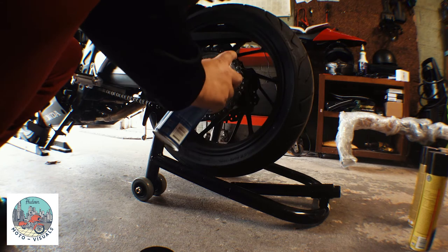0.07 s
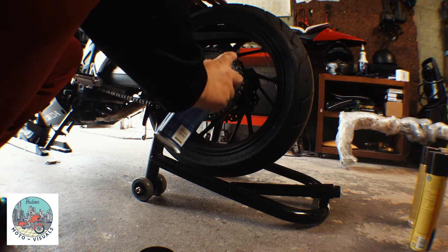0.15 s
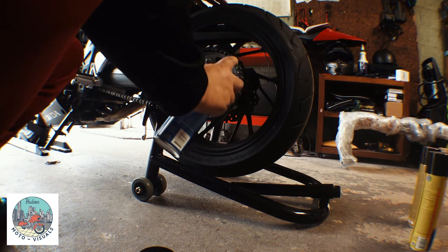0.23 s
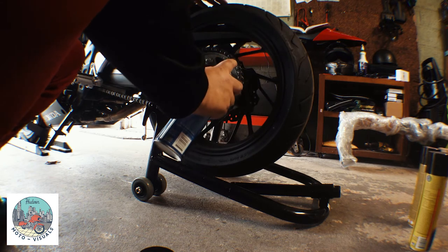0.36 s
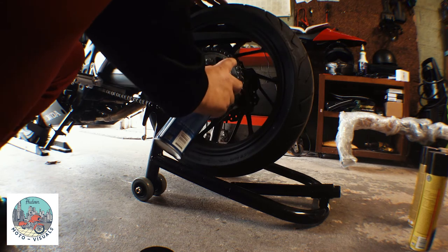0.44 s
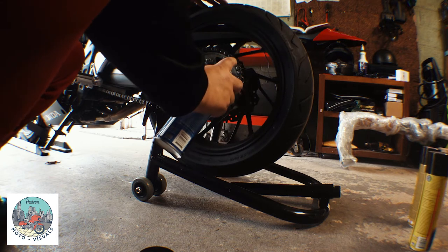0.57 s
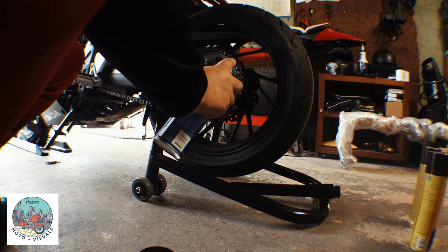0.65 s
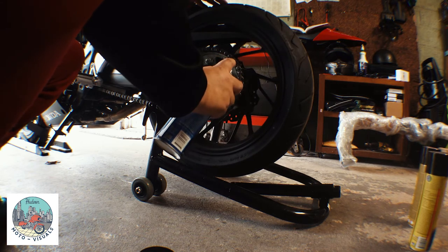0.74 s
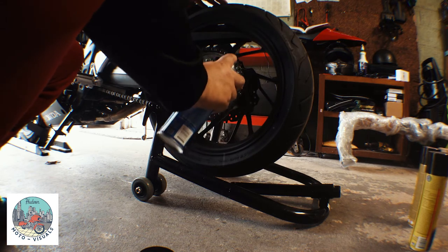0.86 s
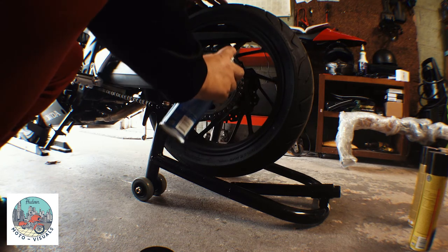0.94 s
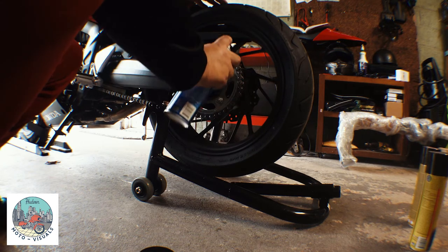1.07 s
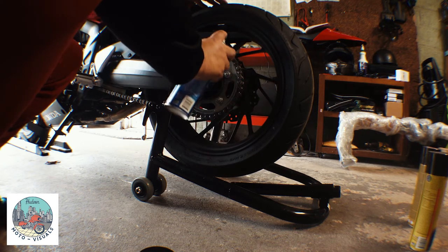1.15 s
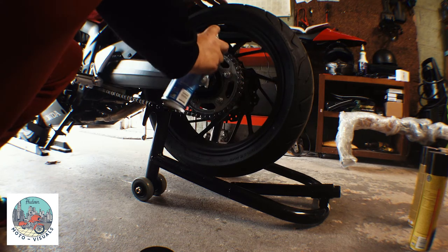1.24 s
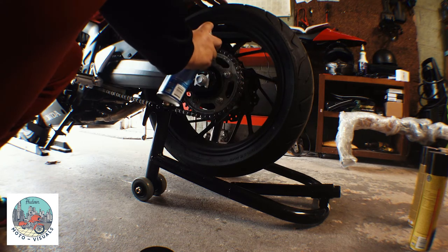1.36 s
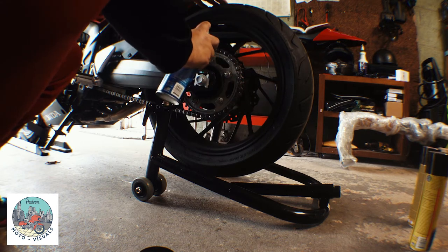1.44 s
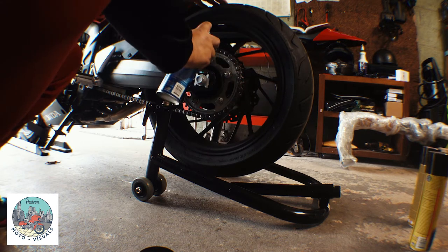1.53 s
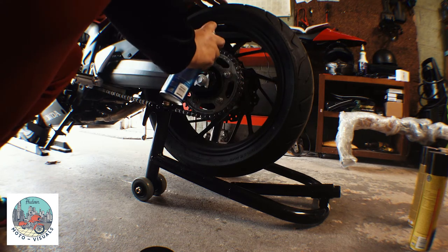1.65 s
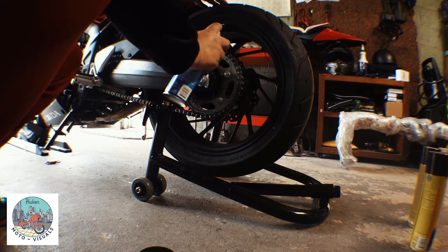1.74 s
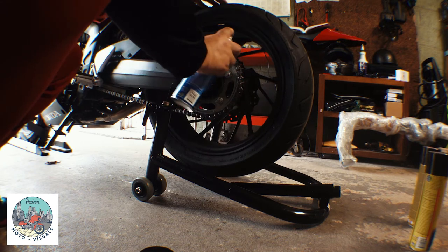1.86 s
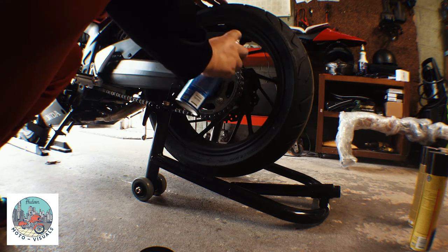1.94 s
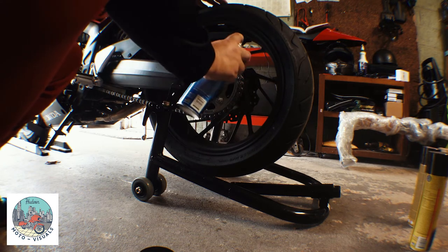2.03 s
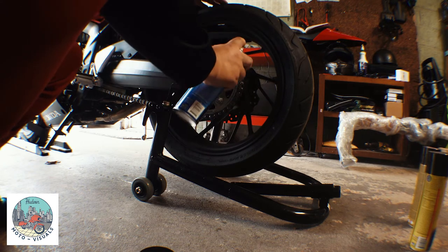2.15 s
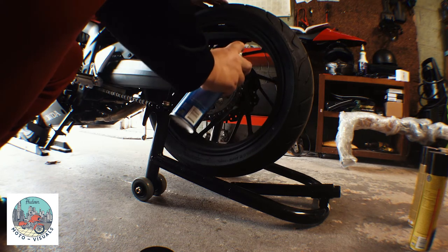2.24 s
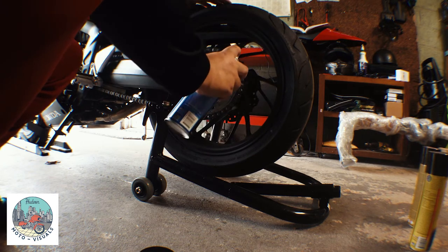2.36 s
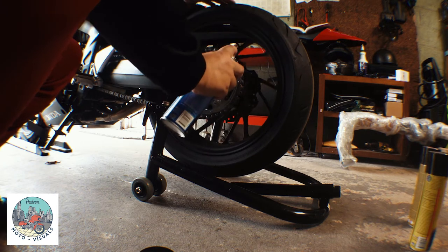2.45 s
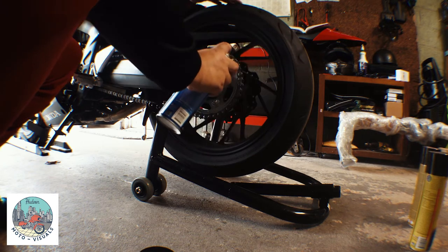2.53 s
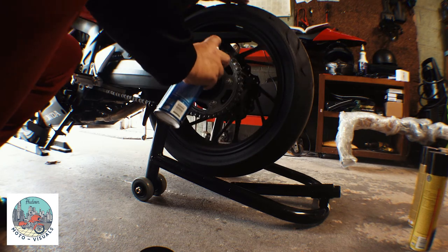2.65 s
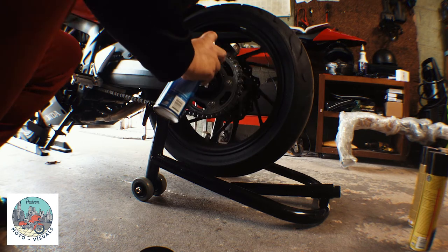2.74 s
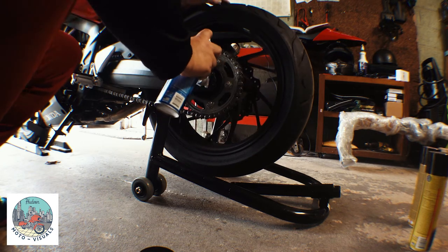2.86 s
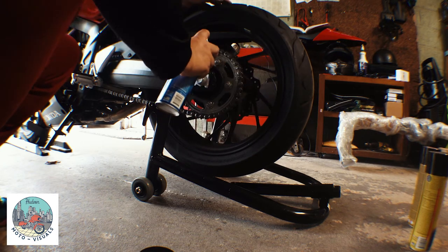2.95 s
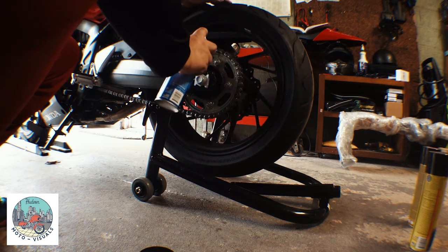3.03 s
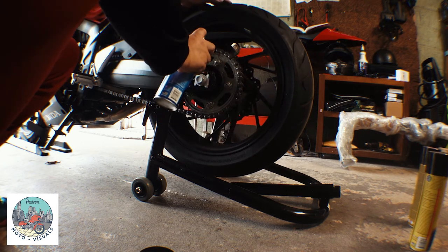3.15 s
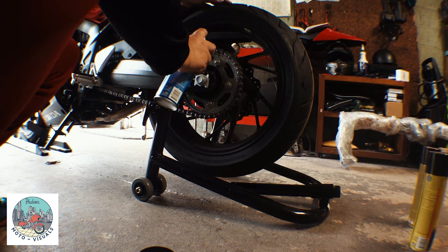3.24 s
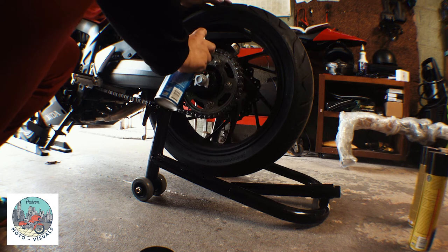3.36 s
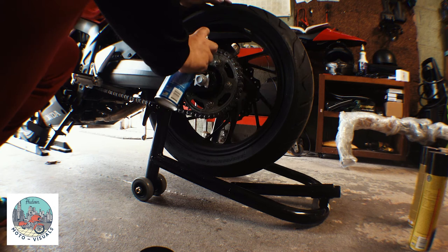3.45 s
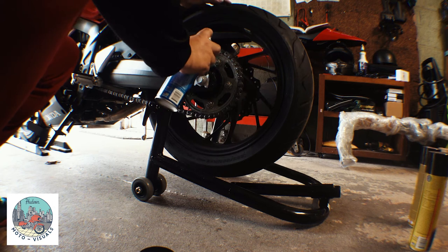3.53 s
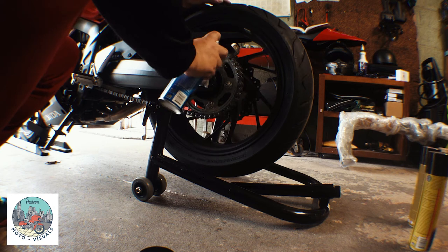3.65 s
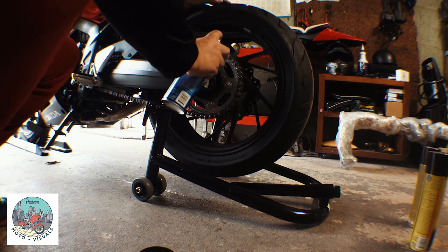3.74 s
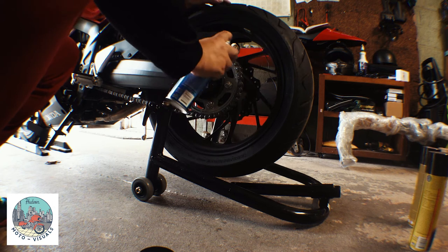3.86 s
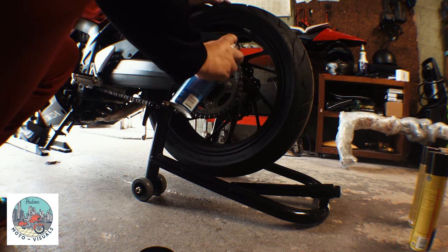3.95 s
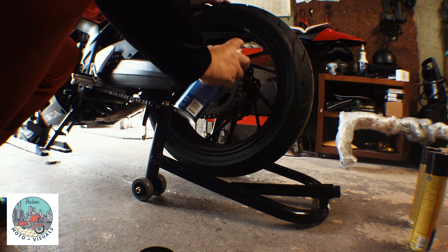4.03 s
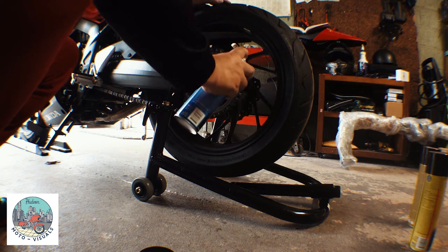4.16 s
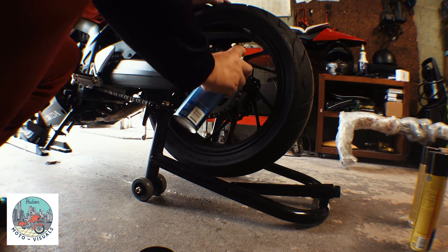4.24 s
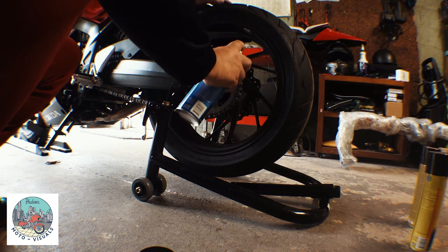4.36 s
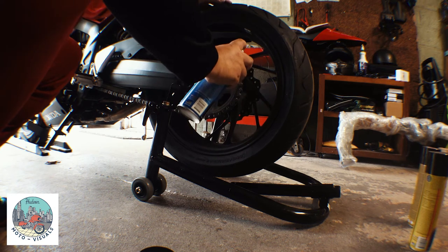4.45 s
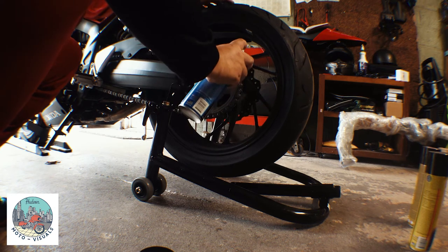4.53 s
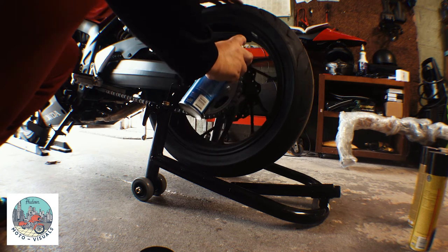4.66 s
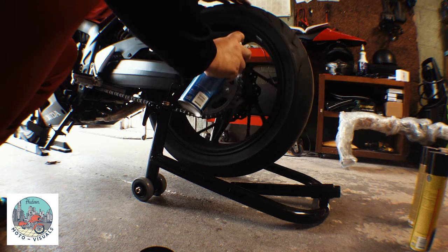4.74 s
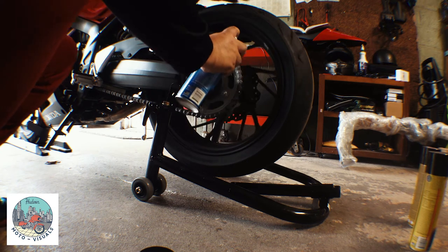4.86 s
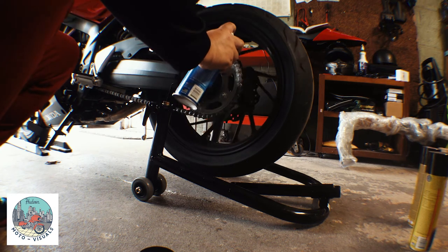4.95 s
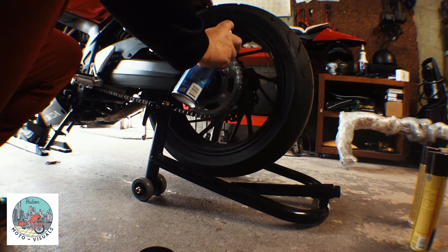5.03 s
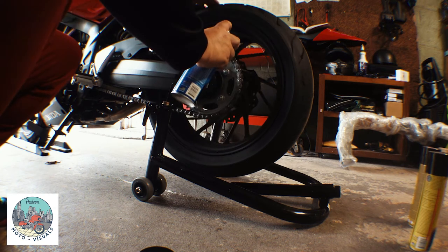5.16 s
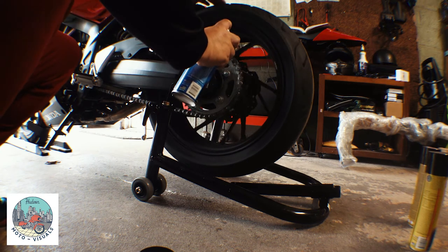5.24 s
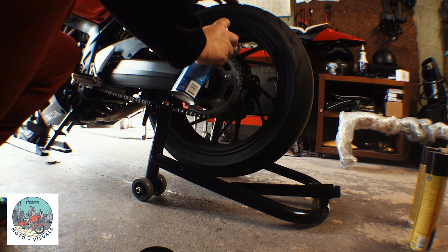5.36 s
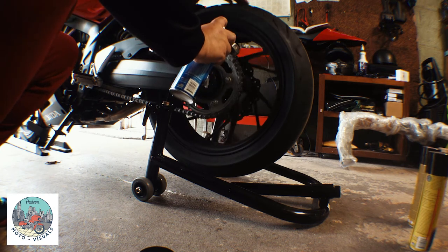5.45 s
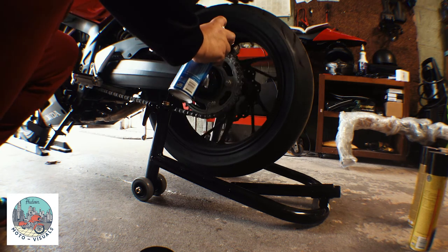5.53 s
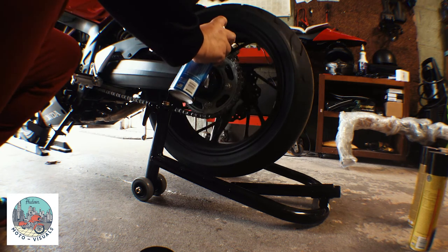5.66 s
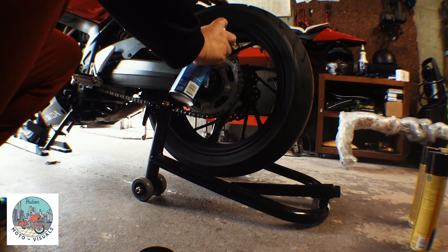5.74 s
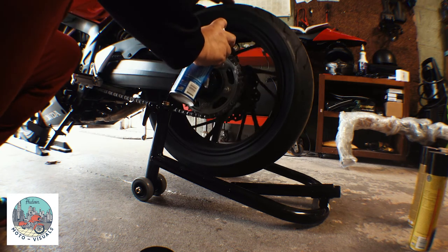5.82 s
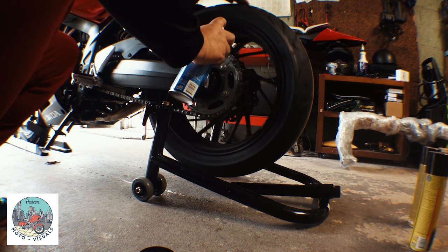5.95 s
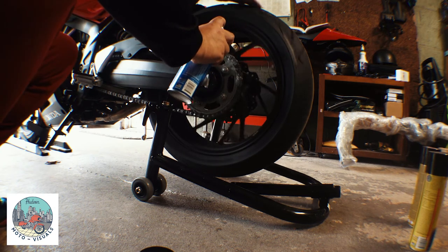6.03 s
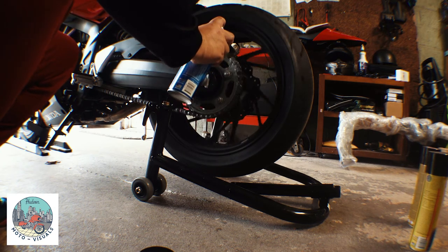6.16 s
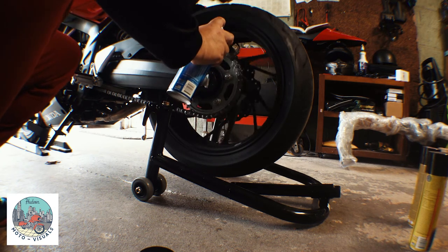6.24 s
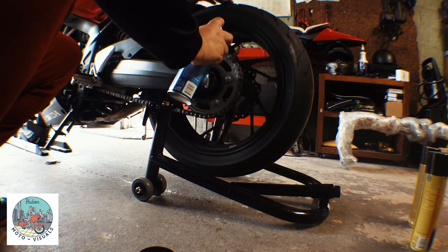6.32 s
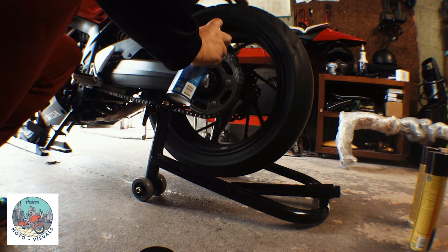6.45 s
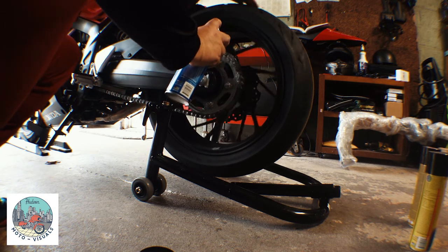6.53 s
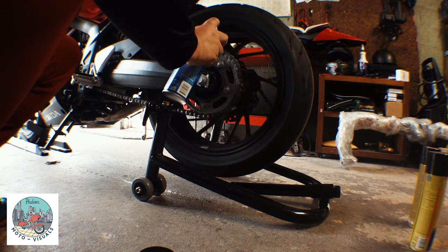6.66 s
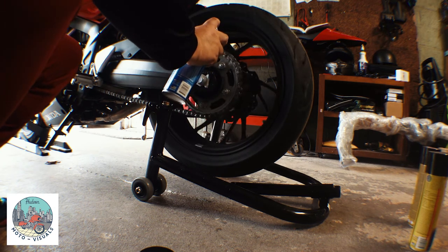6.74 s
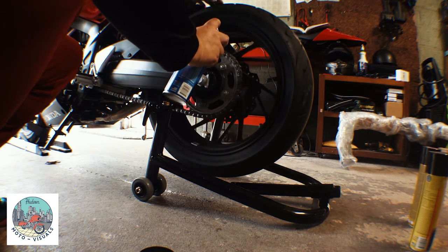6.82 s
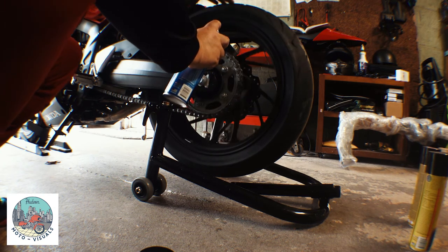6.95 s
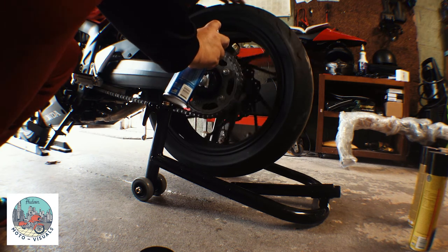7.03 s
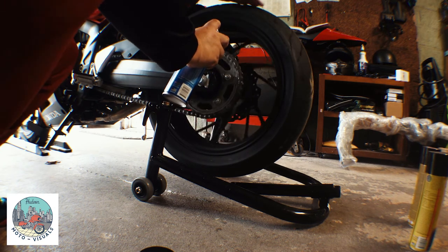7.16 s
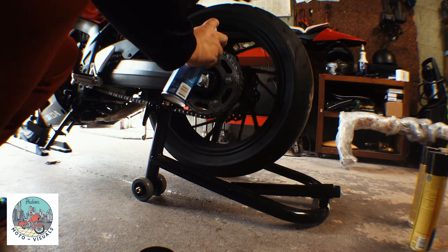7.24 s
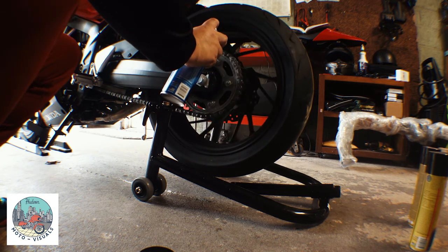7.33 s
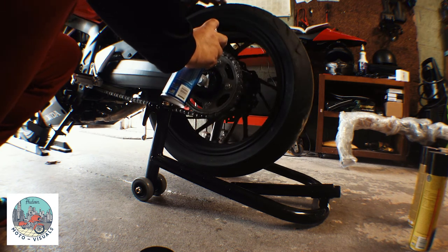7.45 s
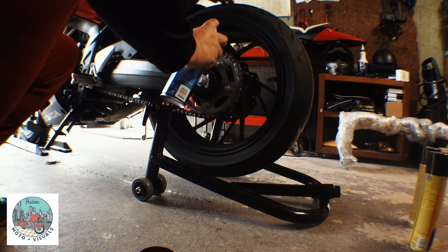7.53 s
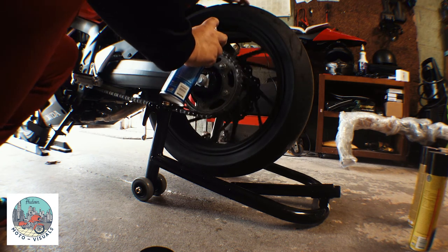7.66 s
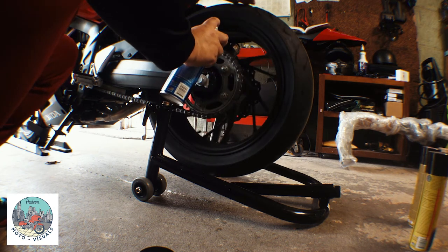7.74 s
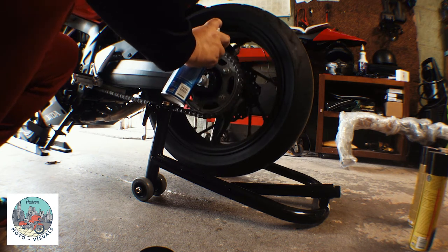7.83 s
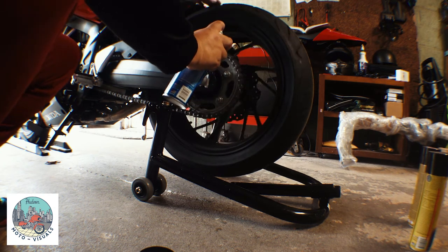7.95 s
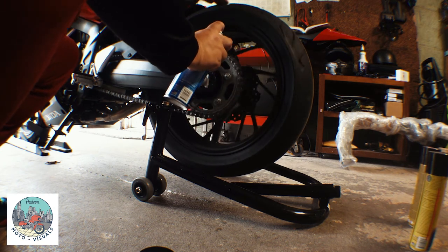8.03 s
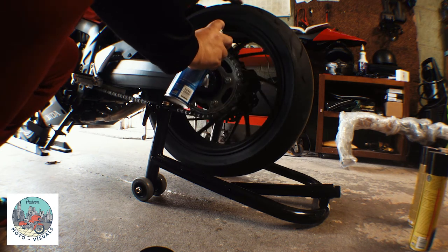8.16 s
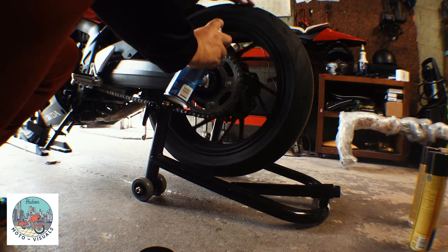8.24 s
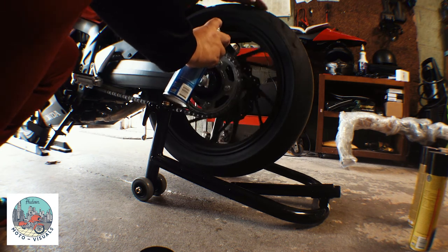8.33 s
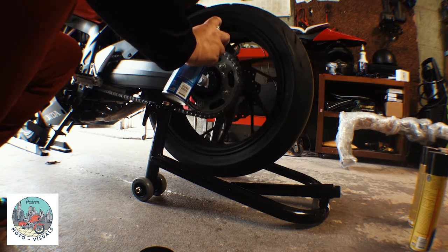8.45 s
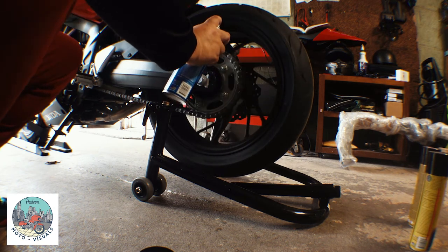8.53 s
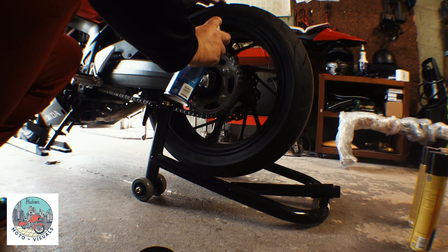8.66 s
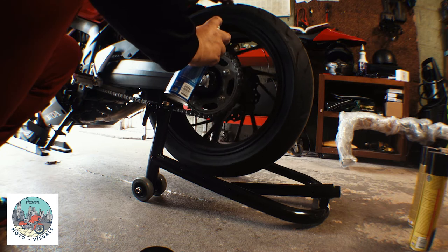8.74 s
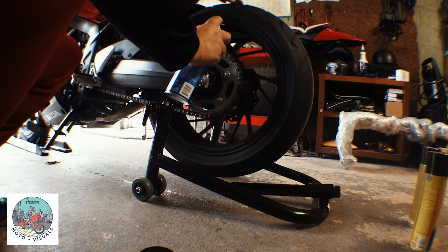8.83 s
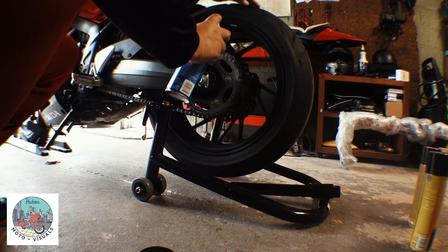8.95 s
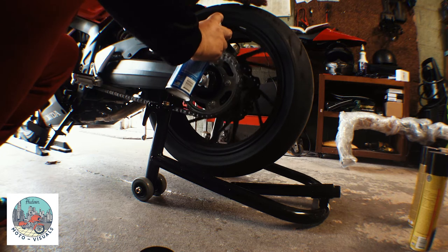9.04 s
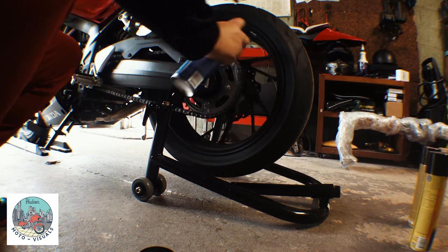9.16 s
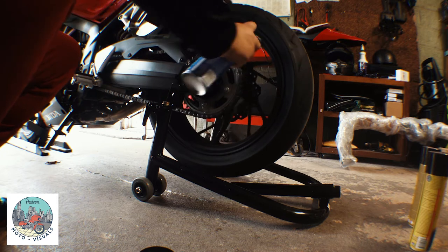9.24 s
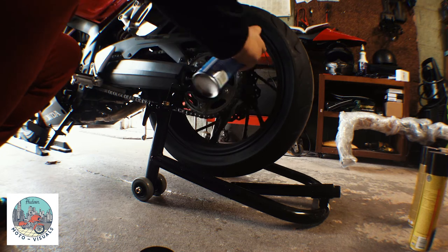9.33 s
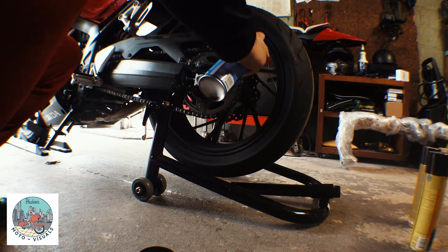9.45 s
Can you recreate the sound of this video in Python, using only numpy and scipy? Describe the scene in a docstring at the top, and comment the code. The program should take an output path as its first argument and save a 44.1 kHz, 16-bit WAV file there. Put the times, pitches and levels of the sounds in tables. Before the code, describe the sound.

After soft bumps and small ticks, bright, crisp spray-can hisses start and stop abruptly, growing more frequent, while birds chirp faintly far outside a garage.

```python
"""Aerosol cleaner hisses onto a motorcycle chain in short and long bursts, in a garage.
Each burst is valve-gated jet noise plus splash noise, coloured by the aim and the metal around it.
Droplets tick as short resonant crackles, stick-slip knocks creak and low modes bump.
A sleeve rustles as grainy noise and birds sing far outside as burry tone glides.
Diffuse room noise tails and a low outdoor rumble with faint hums lie around it all."""
import sys
import numpy as np
from scipy import signal
from scipy.fft import rfft, irfft, next_fast_len
from scipy.io import wavfile
from scipy.ndimage import uniform_filter1d, map_coordinates

SR = 44100
rng = np.random.default_rng(int(sys.argv[2]) if len(sys.argv) > 2 else 0)


def master(y):
    """Save y as 16-bit WAV."""
    cut = np.clip(np.atleast_2d(y).T, -1, 1)
    pcm = np.round(cut * 32767)  # scale
    wavfile.write(sys.argv[1], SR, pcm.astype(np.int16))


N = 418509
SOUND_SPEED_M_S = 343

# Presses of the nozzle, and one weak leak at 8.275 s from the valve not quite shut.
# Each row: valve cracks open in s, pushed down in s, let go in s, closing time in s,
# half-open flow in dB, spray level in dB, flow drift while held in dB per s, splash re jet in dB,
# treble beam in dB, first cavity in Hz, later cavity in Hz, cavity peak in dB, echo detour in m, echo gain.
VALVE_OPENINGS = [ (1.555, 1.612, 2.022, .011, -21, -14, -3, -15, -1.5, 5880, 8880, 2.5, .21, .1),
                  (3.219, 3.232, 3.366, .012, -21, -14, 0, -15.8, -3, 8600, 8550, 3, .257, -.32),
                  (4.505, 4.522, 4.905, .016, -17, -15, 1, -14, -.3, 8250, 5200, 3, .2, .18),
                  (5.138, 5.143, 5.32, .024, -9, -14.1, -18, -13.7, -.3, 7700, 7650, 5.5, .354, .2),
                  (5.473, 5.53, 5.76, .028, -5.5, -15.8, -5, -15, .3, 7920, 8160, 5, .404, -.11),
                  (6.023, 6.028, 6.785, .046, -7, -15.8, -4.5, -14.7, 1.5, 8440, 7500, 5, .298, -.11),
                  (7.01, 7.044, 7.465, .015, -11, -17.3, 0, -14.2, -.7, 7500, 8130, 4.5, .484, -.16),
                  (7.878, 7.882, 8.26, .04, -5, -16.1, -3, -14.2, 1.3, 8800, 8050, 3.5, .486, -.15),
                  (8.275, 8.28, 8.345, .04, -3, -36, -20, -6, 0, 8100, 8100, 2, .486, -.1),
                  (8.388, 8.394, 8.925, .049, -7, -17.7, 0, -14.2, .5, 8030, 6950, 4.5, .32, -.14)]


def amp(db):
    """Decibels to gain."""
    return 10 ** (np.asarray(db) / 20)


def unit(x):
    """x at rms 1."""
    return x / np.sqrt(np.mean(x ** 2) + 1e-20)


def along(points, hz):
    """(Hz, value) points interpolated on a log frequency axis."""
    f, v = np.transpose(points)
    return np.interp(np.log(hz + 1), np.log(f + 1), v)


def wobble(rate_hz, size):
    """A smooth random curve with rate_hz knots a second."""
    knots = rng.standard_normal(int(size * rate_hz / SR) + 4)
    return map_coordinates(knots, [np.arange(size) * rate_hz / SR])


def filtered(x, response):
    """x through a given frequency response."""
    m = next_fast_len(len(x) + 8192)
    return irfft(rfft(x, m) * response(np.fft.rfftfreq(m, 1 / SR)), m)[:len(x)]


def noise(spectrum, size):
    """Noise of rms 1, shaped by (Hz, relative dB per Hz) points."""
    return unit(filtered(rng.standard_normal(size), lambda hz: amp(along(spectrum, hz))))


def spray(cavity_width_hz=130, sputter_grain_db=0.72):
    """The valve gates a turbulent jet; the liquid splashes on the chain; nearby metal colours both."""
    # Turbulent jet noise. Each row: frequency in Hz, relative level in dB per Hz.
    jet_spectrum = [(2500, -43), (3800, -17), (5000, -8), (6700, -4), (7600, -.5), (8700, -1), (9500, -8),
                    (10700, -13.5), (13000, -14), (15500, -18.5)]
    # Liquid striking the chain. Each row: frequency in Hz, relative level in dB per Hz.
    splash_spectrum = [(200, -33), (650, -21), (950, -4.5), (1130, -9.5), (1300, -2), (1650, -6), (1950, 2),
                       (2300, -1.5), (3000, 3.5), (3800, -0.5), (4600, 1), (7000, -41.5)]
    crack_s, open_s = 0.017, 0.014  # valve leaves its seat; finger pushes it right down
    splash_follows = 0.6  # dB of splash per dB of flow: a half-open valve sprays wetter
    sweep_hz, sweep_db, sweep_lag_s = 2.6, 0.26, 0.051  # hand sweeps to and fro along the chain
    out = np.zeros(N + SR)
    for (start_s, push_s, close_s, fall_s, half_db, spray_db, drift_db_per_s,
         splash_db, beam_db, first_hz, later_hz, cavity_db, detour_m, echo_gain) in VALVE_OPENINGS:
        size = int((close_s - start_s + 0.091) * SR)
        t = start_s + np.arange(size) / SR
        opening = np.clip((t - start_s) / crack_s, 0, 1) ** 2
        closing = np.clip(1 - (t - close_s) / fall_s, 0, 1)
        held_s = np.maximum(t - push_s, 0)
        flow_db = half_db * np.exp(-held_s / open_s) + drift_db_per_s * held_s
        flow_db += sweep_db * np.cos(2 * np.pi * sweep_hz * (held_s - sweep_lag_s))
        # flow_db is applied to both below, so only the splash's difference goes in here
        splash_gain = amp(splash_db + (splash_follows - 1) * flow_db)
        mist = noise(jet_spectrum, size) + splash_gain * noise(splash_spectrum, size)
        # the aim moves from one resonant gap to another
        first = cavity(mist, first_hz, cavity_db, cavity_width_hz)
        later = cavity(mist, later_hz, cavity_db, cavity_width_hz)
        moved = np.interp((t - start_s) / (close_s - start_s), [.2, .45], [0, 1])
        mist = (1 - moved) * first + moved * later
        mist = filtered(mist, lambda hz: aimed(hz, beam_db, detour_m, echo_gain))
        mist = spokes(mist, gain=0.14, drift_m=0.011, corner_hz=2000, count=16)
        mist = roving(mist, shift_db=1.0, flutter_db=0.1)
        # gas and liquid leave the nozzle in uneven slugs
        sputter_db = 0.25 * wobble(40, size) + sputter_grain_db * wobble(330, size)
        out[round(start_s * SR):][:size] += amp(spray_db + flow_db + sputter_db) * opening * closing * mist
    return out[:N]


def cavity(x, centre_hz, peak_db, width_hz):
    """The gap that the jet blows into adds one resonant peak."""
    return filtered(x, lambda hz: 1 + (amp(peak_db) - 1) / (1 + 1j * (hz - centre_hz) / width_hz))


def aimed(hz, beam_db, detour_m, echo_gain):
    """Response set by the aim: the treble beams, rim and sprocket echo, the wheel rings."""
    # Wheel peaks and dips, alike at every aim. Each row: centre in Hz, half width in Hz, gain in dB.
    wheel_peaks = [(3870, 120, 3.2), (4300, 150, -2), (4700, 50, 1.5), (5980, 100, 1.5), (12380, 150, 2)]
    beam_hz = 10000  # above this the jet beams, so the aim sets how much is heard
    rim_detour_m, rim_gain = 0.279, 0.1  # alike at every aim
    echo = lambda path_m: np.exp(-2j * np.pi * hz * path_m / SOUND_SPEED_M_S)
    colour_db = beam_db * hz ** 8 / (hz ** 8 + float(beam_hz) ** 8)
    colour_db += sum(db / (1 + ((hz - centre_hz) / half_hz) ** 2) for centre_hz, half_hz, db in wheel_peaks)
    return amp(colour_db) * (1 + rim_gain * echo(rim_detour_m) + echo_gain * echo(detour_m))


def spokes(x, gain, drift_m, corner_hz, count):
    """Weak, mostly treble reflections off thin spokes and links; their paths drift with the hand."""
    i = np.arange(len(x))
    treble = filtered(x, lambda hz: hz / (hz + corner_hz))
    out = x.copy()
    for path_m in rng.uniform(0.4047, 3, count):
        delay_samples = (path_m + drift_m * wobble(3, len(x))) / SOUND_SPEED_M_S * SR
        out += gain * np.interp(i - delay_samples, i, treble, left=0)
    return unit(out)


def roving(x, shift_db, flutter_db):
    """The colour shifts as the jet roves over the links, and flutters as the liquid breaks up."""
    z = signal.stft(x, nperseg=256)[2]

    def field(bins, frames):
        across = uniform_filter1d(rng.standard_normal(z.shape), bins, 0)
        return unit(uniform_filter1d(across, frames, 1))

    gain_db = shift_db * field(bins=3, frames=70) + flutter_db * field(bins=14, frames=3)
    return unit(signal.istft(z * amp(gain_db), nperseg=256)[1][:len(x)])


def spits(spit_db=-34, t60_s=0.062, attack_s=0.0042):
    """As the valve cracks open, liquid left in the nozzle is spat out as a decaying noise burst."""
    # First drops through the nozzle. Each row: frequency in Hz, relative level in dB per Hz.
    spit_spectrum = [(800, -22.5), (2200, -8.5), (2800, 4.5), (3400, -10.5), (4300, -9.5), (5200, -5),
                     (7000, -9.5), (8500, 1.5), (9500, -13), (15000, -21)]
    out, t = np.zeros(N + SR), np.arange(SR // 8) / SR
    envelope = amp(spit_db - 60 * t / t60_s) * np.minimum(t / attack_s, 1) ** 2
    for start_s, *_ in VALVE_OPENINGS:
        out[round(start_s * SR):][:len(t)] += envelope * noise(spit_spectrum, len(t))
    return out[:N]


def ticks(t60_s=0.014, faint_width=0.12, faint_db=-53, count=34):
    """Droplets tick as short, narrow crackles, faint ones at random; a few rows are broad clicks."""
    # Droplet ticks, and a few broad clicks of the can or nozzle.
    # Each row: start in s, peak level in dB, pitch in Hz, bandwidth over pitch.
    clear_ticks = [(.3808, -45, 6520, 0.12), (.4414, -46, 8470, .11), (.8934, -49, 8900, .11),
                   (.9979, -47, 7550, .11), (1.1453, -40, 8900, .11), (1.2503, -44, 8720, 0.097),
                   (1.3977, -31.5, 4700, .9), (2.5611, -47, 6050, .3), (2.9219, -49, 8100, .6),
                   (3.0071, -44, 7340, 0.113), (3.0814, -45, 8230, .11), (4.3683, -51, 12700, .11),
                   (9.2857, -31.5, 7030, 0.55)]
    out, t = np.zeros(N + SR), np.arange(2048) / SR
    faint_ticks = [(when * N / SR, faint_db + 6 * size, 6000 + 6000 * pitch, faint_width)
                   for when, size, pitch in rng.random((count, 3))]
    for start_s, db, pitch_hz, width in list(clear_ticks) + faint_ticks:
        snap = rng.standard_normal(len(t)) * amp(-60 * t / t60_s)
        width_hz = width * pitch_hz
        tick = filtered(snap, lambda hz: 1j * hz * width_hz / (pitch_hz ** 2 - hz ** 2 + 1j * hz * width_hz))
        out[round(start_s * SR):][:len(t)] += amp(db) * tick / np.abs(tick).max()
    return out[:N]


def creaks(body_t60_s=0.21, snap_t60_s=0.014, snap_db=3):
    """Stick-slip at a slightly uneven rate: each slip snaps and knocks a hollow body."""
    # Creaks. Each row: start in s, length in s, slips per s, level in dB.
    creak_runs = [(5.057, .058, 98, -39), (8.596, .04, 80, -42)]
    # Hollow body. Each row: frequency in Hz, relative level in dB per Hz.
    body_spectrum = [(100, -27), (260, 0), (600, -2.5), (1000, -2), (1600, -2.5), (2400, -11), (5000, -14),
                     (7000, -20.5), (15000, -30)]
    # Snap. Each row: frequency in Hz, relative level in dB per Hz.
    snap_spectrum = [(500, -16.5), (1500, 0.5), (5000, -8), (7000, -11), (10000, -25), (15000, -37.5)]
    out, t = np.zeros(N + SR), np.arange(4096) / SR
    for start_s, length_s, rate_hz, db in creak_runs:
        for slip_s in np.arange(start_s, start_s + length_s, 1 / rate_hz):
            body = amp(-60 * t / body_t60_s) * noise(body_spectrum, len(t))
            snap = amp(snap_db - 60 * t / snap_t60_s) * noise(snap_spectrum, len(t))
            onset_s = slip_s + rng.normal(0, .0005)
            out[round(onset_s * SR):][:len(t)] += amp(db) * (body + snap)
    return out[:N]


def bumps(attack_s=0.0032, thud_db=-7, thud_t60_s=0.54):
    """Soft, heavy contacts ring a few low modes and leave a short rumble."""
    # Dull bumps. Each row: start in s, level in dB.
    contacts = [(.727, -32.5), (0.764, -34), (0.955, -39.5), (1.0, -45), (1.139, -42.5), (1.211, -53.5)]
    # Low modes. Each row: frequency in Hz, mean level in dB, t60 in s.
    modes = [(72.9, 0.5, 0.4), (89, -9, 0.18), (134, -5, 0.098), (185, -8, 0.19), (248.5, -9, 0.19)]
    # Rumble. Each row: frequency in Hz, relative level in dB per Hz.
    thud_spectrum = [(25, -8), (45, 7), (80, -2.5), (250, -5.5), (450, -56)]
    out, t = np.zeros(N + SR), np.arange(SR // 2) / SR
    for start_s, db in contacts:
        ring = sum(amp(mode_db + rng.normal(0, 2.5) - 60 * t / t60_s) * np.sin(2 * np.pi * hz * t)
                   for hz, mode_db, t60_s in modes)
        rumble = amp(thud_db - 60 * t / thud_t60_s) * noise(thud_spectrum, len(t))
        out[round(start_s * SR):][:len(t)] += amp(db) * (ring + rumble) * (1 - np.exp(-t / attack_s))
    return out[:N]


def sleeve(grain_db=3):
    """Cloth brushes in short, grainy swells as the arm shifts."""
    # Sleeve rustles. Each row: centre in s, half length in s, level in dB.
    rustles = [(0.093, 0.51, -69.5), (0.901, 0.45, -70), (2.63, 0.069, -60), (2.7, .02, -56),
               (2.765, 0.072, -66), (2.854, 0.028, -59), (7.66, 0.051, -58.5), (7.765, 0.051, -51.5),
               (9.293, 0.058, -55)]
    # Cloth noise. Each row: frequency in Hz, relative level in dB per Hz.
    cloth_spectrum = [(300, -15.5), (1500, 6), (6000, 1.5), (9000, 1), (15000, -22)]
    t = np.arange(N) / SR
    swell = sum(amp(db) * np.exp(-((t - centre_s) / half_s) ** 2) for centre_s, half_s, db in rustles)
    return swell * unit(noise(cloth_spectrum, N) * amp(grain_db * wobble(250, N)))


def birds(scatter_t60_s=0.34, direct=0.29):
    """Burry notes that hold, drop or rise, and settle, smeared by the walls outside."""
    # The song. Each row: start in s, call name, level in dB before the walls.
    song_calls = [(.005, "pair", -50), (.36, "whistle", -59.5), (.483, "peep", -61), (.598, "slur", -46),
                  (.991, "triple", -55.5), (1.45, "trill", -65), (2.167, "pair", -50), (2.367, "slur", -47),
                  (2.677, "peep", -56), (2.803, "peep", -54), (3.495, "pair", -52), (3.602, "slur", -45),
                  (4.007, "triple", -51.5), (4.295, "trill", -59), (4.404, "whistle", -56.5),
                  (5.86, "slur", -46.5), (6.82, "slur", -51), (6.95, "peep", -57), (9.064, "slur", -47.5),
                  (9.395, "whistle", -62)]
    # Notes of each named call. Each row: delay in s, length in s, start in Hz, end in Hz, level re call in dB.
    call_notes = { "slur": [(0, .05, 4520, 3850, -1), (.032, .055, 3400, 2620, -.5)],
                  "pair": [(0, .05, 4550, 3880, -3), (.055, .035, 3750, 3270, 0)],
                  "triple": [(0, .095, 4330, 3400, -2), (.1, .07, 4340, 3680, 0),
                  (.167, .06, 3600, 2930, -2)], "peep": [(0, .035, 4500, 4640, 0)],
                  "trill": [(0, .11, 3400, 3280, 0)], "whistle": [(0, .05, 6100, 6500, 0),
                  (.1, .035, 6500, 6200, 0)]}
    # the one-note call at 3400 Hz is a tail: a faint, low, nearly level note
    call_notes = {("tail" if name == "trill" else name): notes for name, notes in call_notes.items()}
    song_calls = [(s, "tail" if name == "trill" else name, db) for s, name, db in song_calls]
    burr_per_log_glide, burr_limits = 0.45, (0.012, 0.055)  # relative pitch scatter; its least and most
    out = np.zeros(N + SR)
    for start_s, call, call_db in song_calls:
        for delay_s, length_s, start_hz, end_hz, db in call_notes[call]:
            u = np.linspace(0, 1, int(length_s * SR))
            glide = .5 + .5 * np.tanh(5.5 * (u - .42))
            # steep notes are the roughest
            burr = np.clip(burr_per_log_glide * abs(np.log(start_hz / end_hz)), *burr_limits)
            hz = (start_hz + (end_hz - start_hz) * glide) * (1 + burr * wobble(917, len(u)))
            note = signal.windows.tukey(len(u), .25) * np.sin(2 * np.pi * np.cumsum(hz) / SR)
            out[round((start_s + delay_s) * SR):][:len(u)] += amp(call_db + db) * note
    t = np.arange(SR // 4) / SR
    walls = rng.standard_normal(len(t)) * amp(-60 * t / scatter_t60_s)
    return direct * out[:N] + signal.fftconvolve(out, walls / np.linalg.norm(walls))[:N]


def background(floor_db=-50):
    """Distant outdoor rumble, with a few bands that the room holds on to and faint passing hums."""
    # Rumble. Each row: frequency in Hz, relative level in dB per Hz.
    floor_spectrum = [(12, -22), (20, 1.5), (81, -1), (431, -7.5), (524, -10), (942, -10), (1050, -16),
                      (1180, -14.5), (2300, -24.5), (4140, -28.5), (5320, -31.5), (8310, -32), (11000, -41),
                      (13400, -35), (15800, -46.5)]
    # Bands the room holds on to. Each row: centre in Hz, width in Hz, mean level in dB.
    drone_bands = [(127, 16, -69), (331, 40, -70), (982, 78, -67.5)]
    # Far-off hums that come and go. Each row: centre in s, half length in s, frequency in Hz, level in dB.
    passing_hums = [(1.1, 0.17, 445, -62), (2.13, 0.073, 350, -48), (6.8, 0.47, 450, -61.5),
                    (6.7, .25, 112, -54), (8.3, .4, 122.5, -60), (9.35, 0.29, 452, -59)]
    t = np.arange(N) / SR

    def band(centre_hz, width_hz):
        response = lambda hz: 1 / (1 + (2 * (hz - centre_hz) / width_hz) ** 2)
        return unit(filtered(rng.standard_normal(N), response))

    air = amp(floor_db + .4 * wobble(2.5, N)) * noise(floor_spectrum, N)
    for centre_hz, width_hz, db in drone_bands:
        air += amp(db + 1.8 * wobble(0.48, N)) * band(centre_hz, width_hz)
    for centre_s, half_s, centre_hz, db in passing_hums:
        air += amp(db) * np.exp(-((t - centre_s) / half_s) ** 2) * band(centre_hz, width_hz=11)
    return air


def garage(x, gap_s=0.0068):
    """The room's diffuse answer, dying faster in the treble and changing as the can moves."""
    # Reverberation. Each row: frequency in Hz, t60 in s.
    room_t60 = [(200, .45), (2000, 0.29), (6000, 0.25), (9000, 0.24), (15000, 0.16)]
    out = np.zeros(N + 2 * SR)
    for i in range(0, N, SR // 4):
        hz, t, z = signal.stft(rng.standard_normal(SR * 3 // 5), SR, nperseg=256)
        decay = amp(-60 * t / along(room_t60, hz)[:, None])
        tail = signal.istft(z * decay, SR, nperseg=256)[1]
        tail *= 1 - np.exp(-np.arange(len(tail)) / SR / gap_s)
        piece = x[i:i + SR // 2]
        fade = np.sin(np.pi * np.arange(len(piece)) / (SR // 2))  # overlapping pieces keep their power
        answer = signal.fftconvolve(piece * fade, tail / np.linalg.norm(tail))
        out[i:i + len(answer)] += answer
    return out[:N]


def scene():
    """Near sounds are mostly direct; birds come mostly by reflection; both channels are alike."""
    near = spray() + spits() + creaks() + sleeve()
    drops, song = ticks(), birds()
    wet = garage(amp(-11.5) * near + amp(-13.0) * drops + amp(-10.0) * song)
    mono = near + drops + bumps() + song + wet + background()
    return np.array([mono, mono])


def record(dry):
    """The recorder rounds off the highest peaks and keeps nothing above its band limit."""
    ceiling, top_hz = 0.85, 15950
    rounded = dry / (1 + np.abs(dry / ceiling) ** 6) ** (1 / 6)
    return np.array([filtered(x, lambda hz: np.clip((top_hz - hz) / 200, 0, 1)) for x in rounded])


dry = scene()
out = record(dry)
master(out)
```